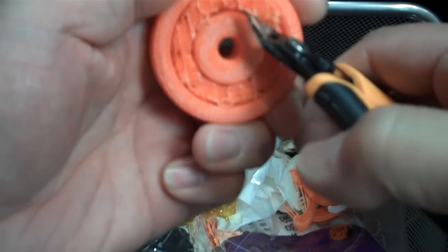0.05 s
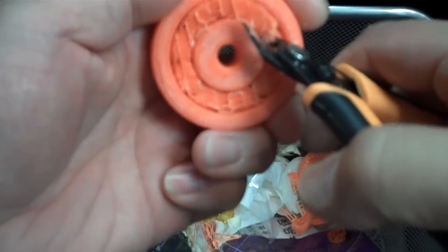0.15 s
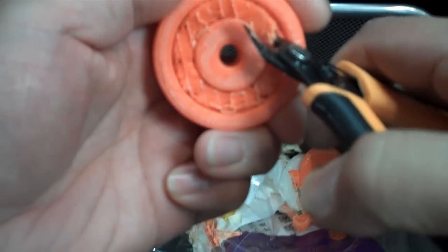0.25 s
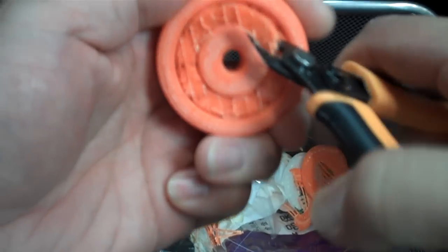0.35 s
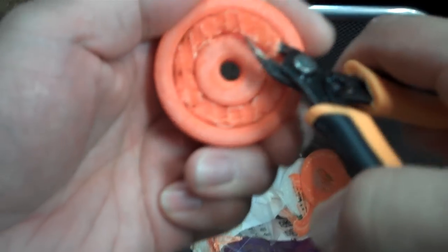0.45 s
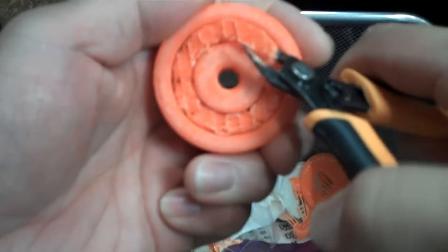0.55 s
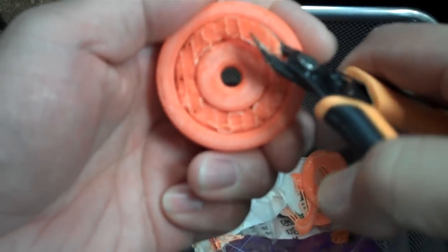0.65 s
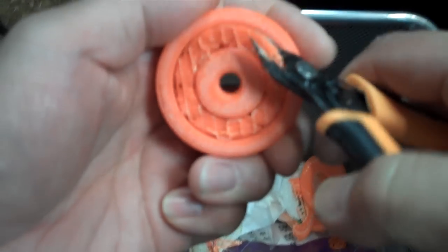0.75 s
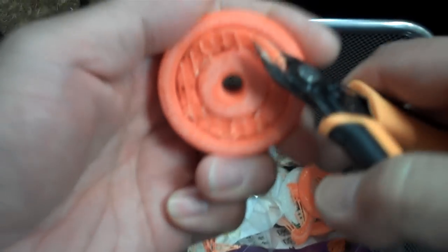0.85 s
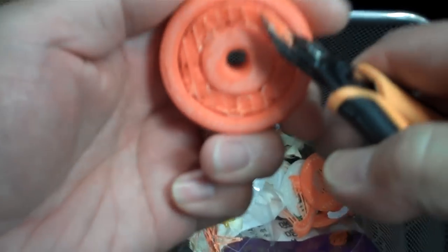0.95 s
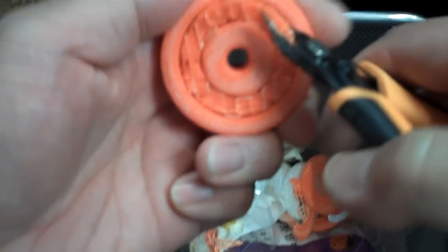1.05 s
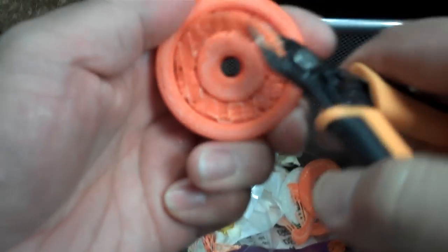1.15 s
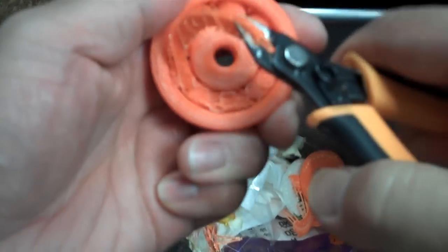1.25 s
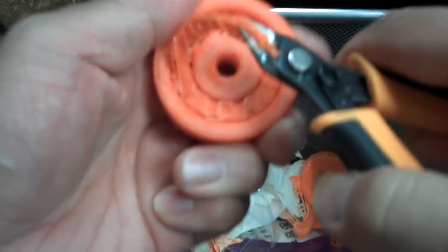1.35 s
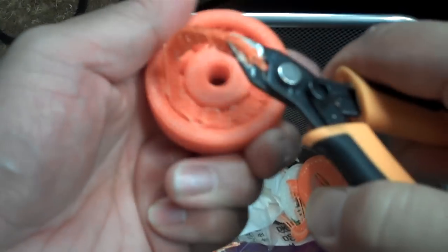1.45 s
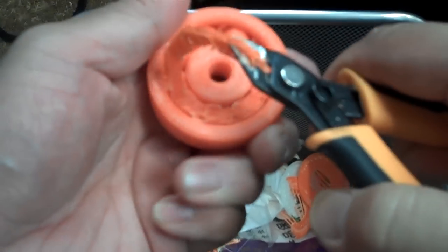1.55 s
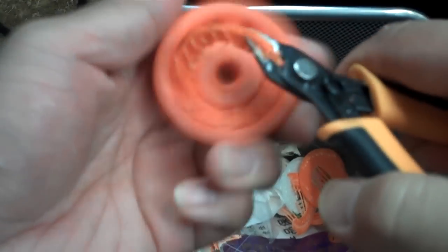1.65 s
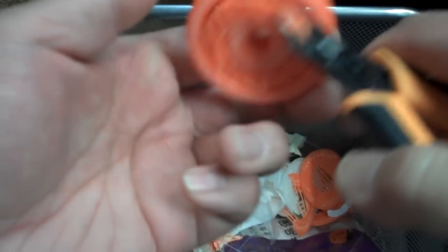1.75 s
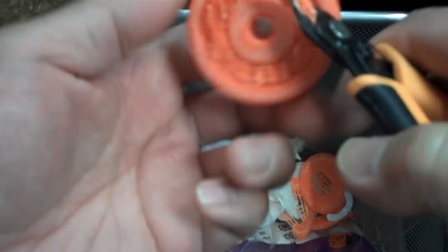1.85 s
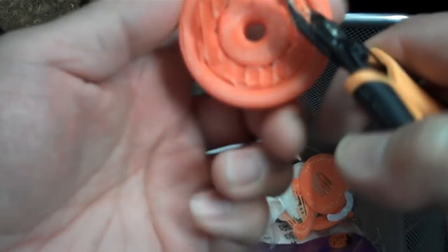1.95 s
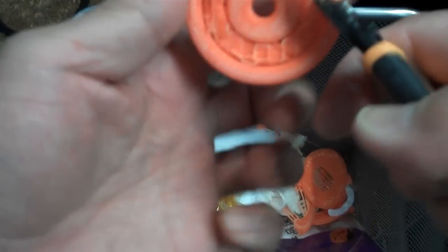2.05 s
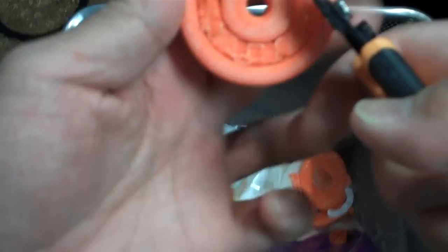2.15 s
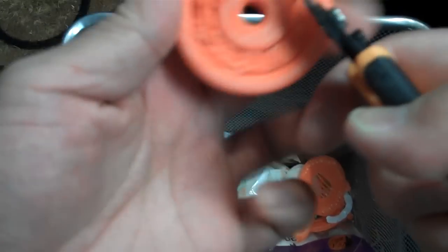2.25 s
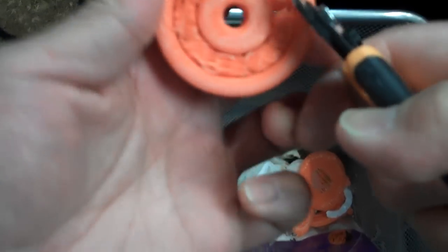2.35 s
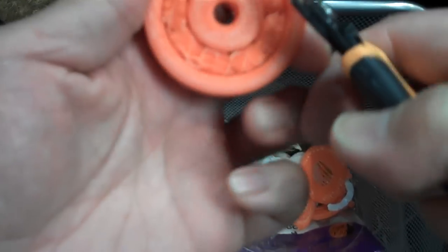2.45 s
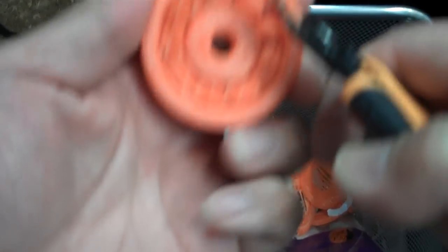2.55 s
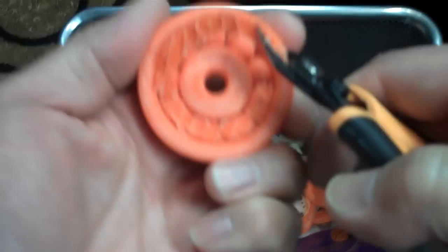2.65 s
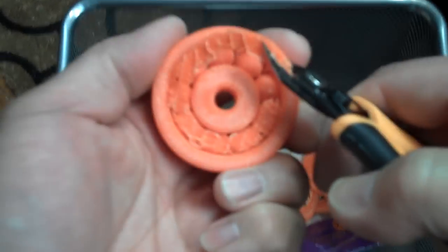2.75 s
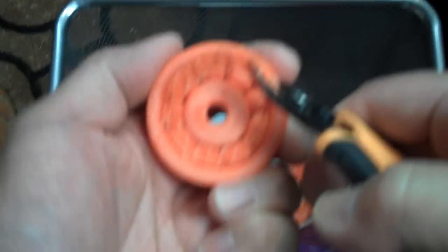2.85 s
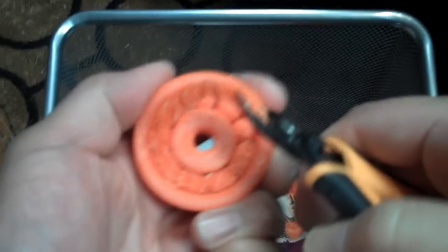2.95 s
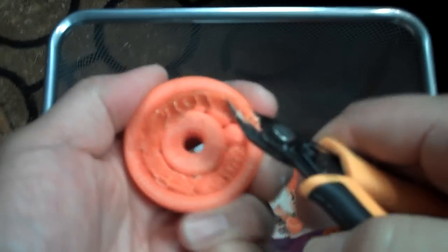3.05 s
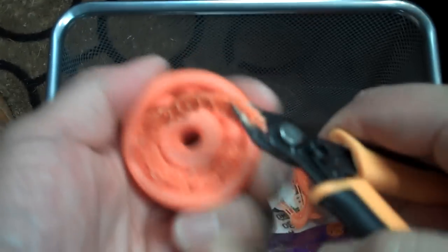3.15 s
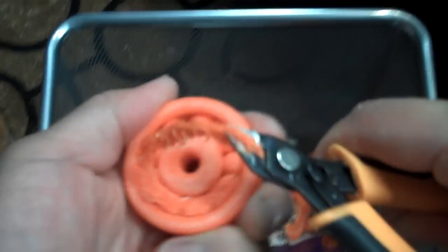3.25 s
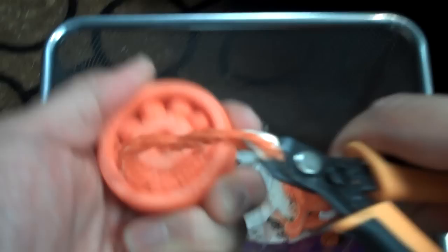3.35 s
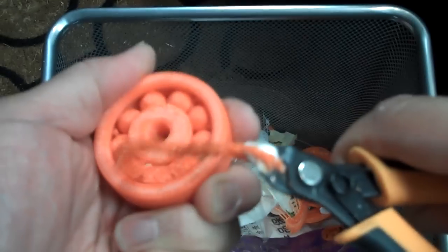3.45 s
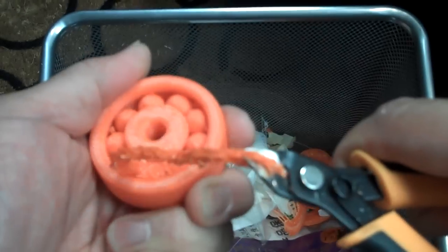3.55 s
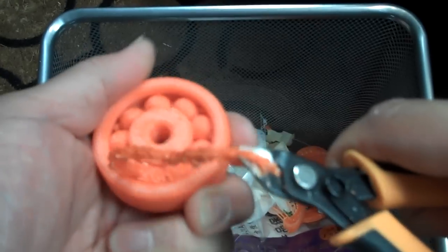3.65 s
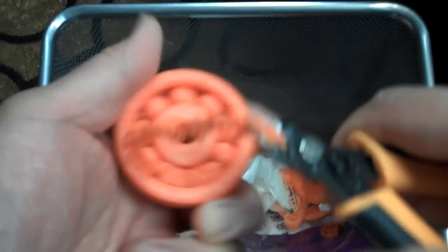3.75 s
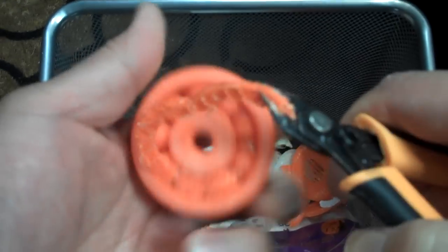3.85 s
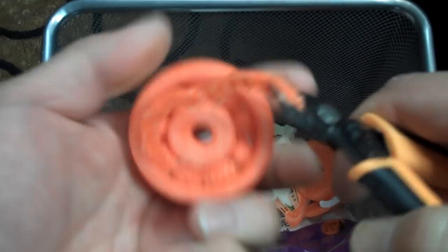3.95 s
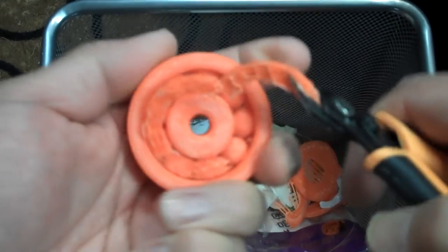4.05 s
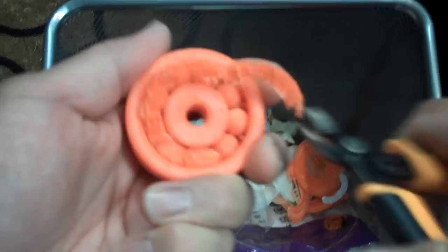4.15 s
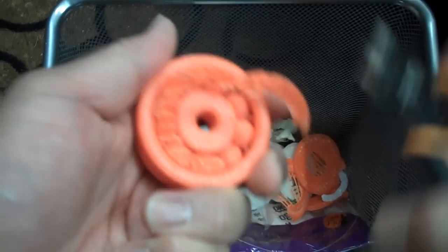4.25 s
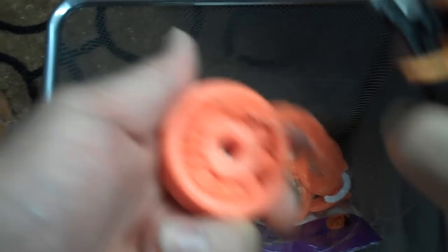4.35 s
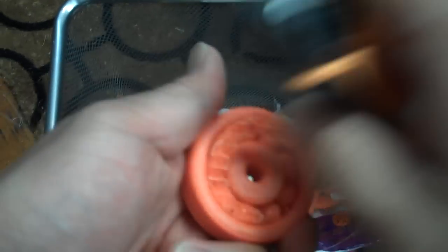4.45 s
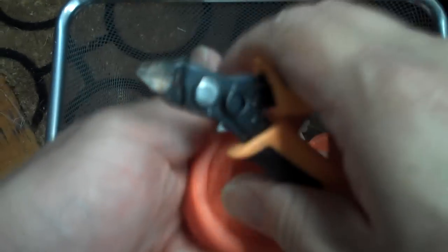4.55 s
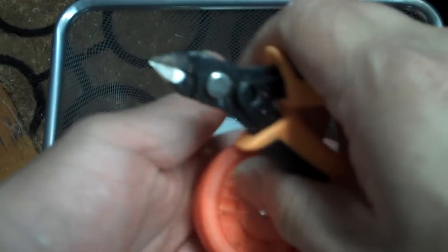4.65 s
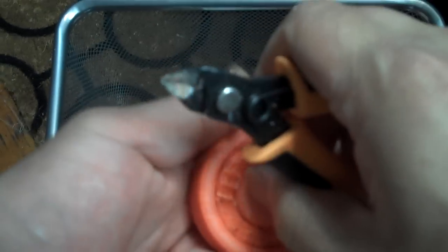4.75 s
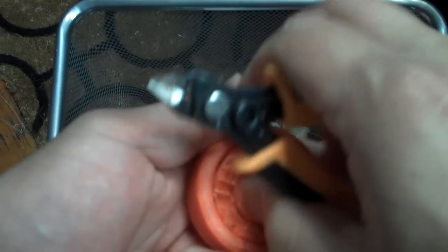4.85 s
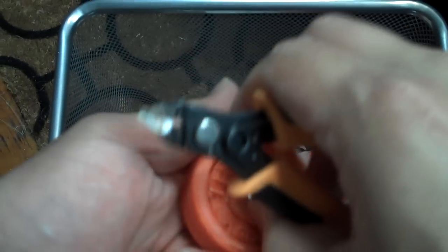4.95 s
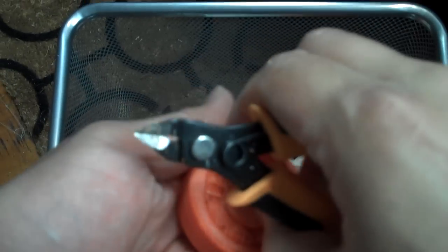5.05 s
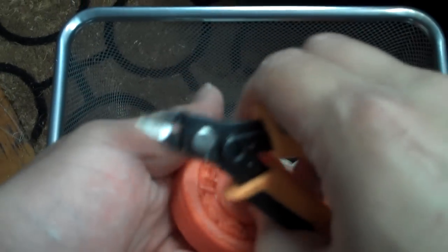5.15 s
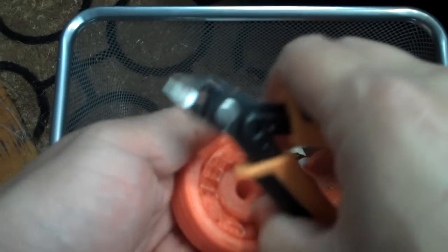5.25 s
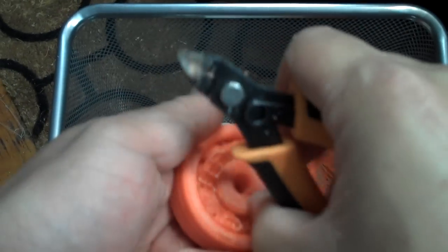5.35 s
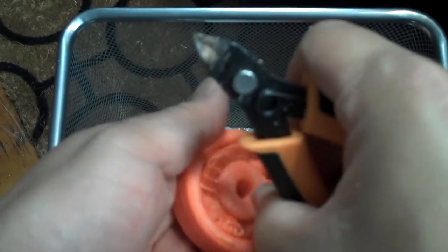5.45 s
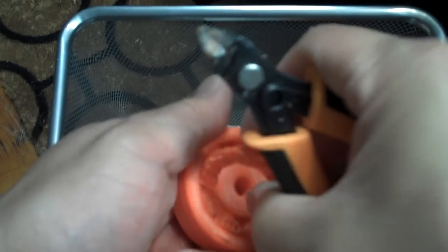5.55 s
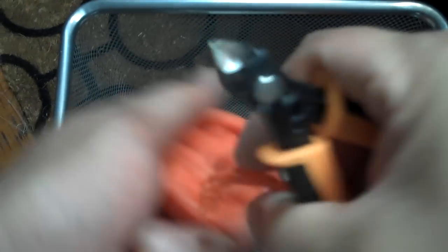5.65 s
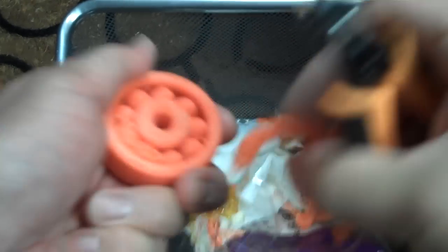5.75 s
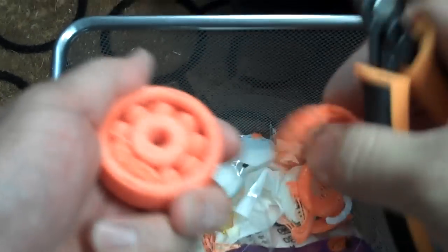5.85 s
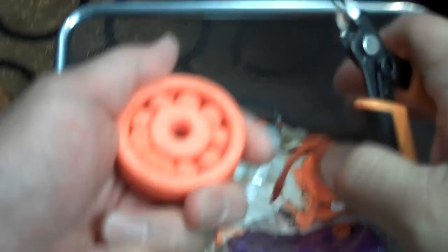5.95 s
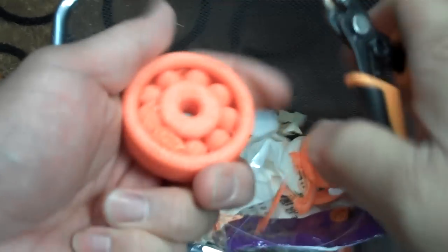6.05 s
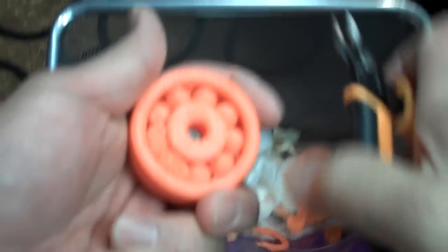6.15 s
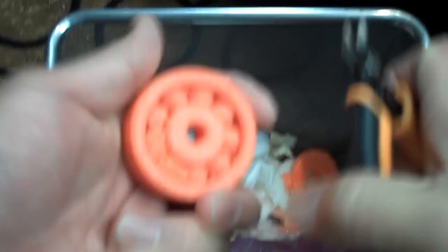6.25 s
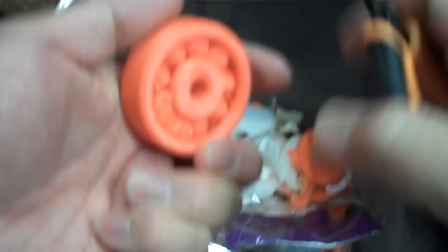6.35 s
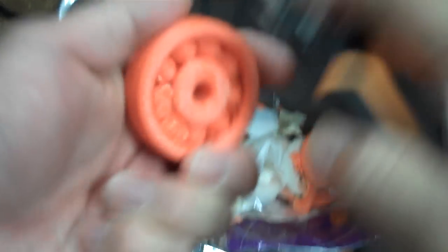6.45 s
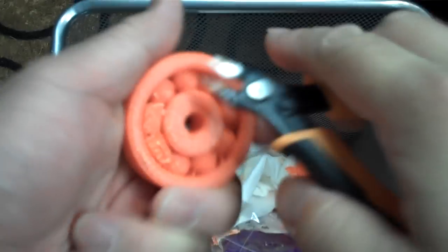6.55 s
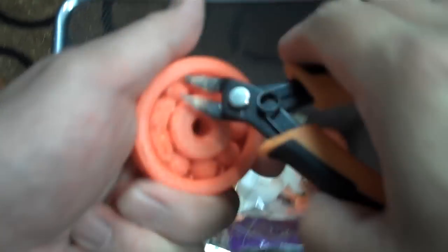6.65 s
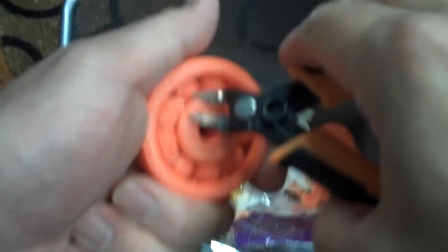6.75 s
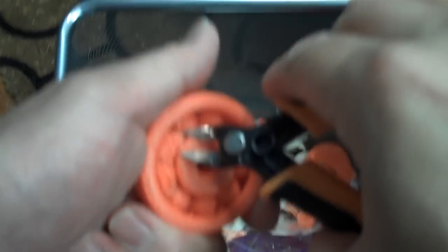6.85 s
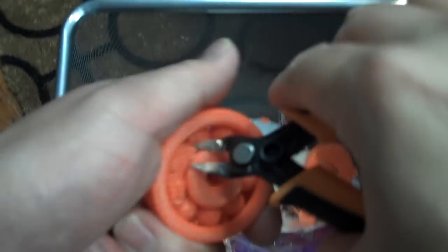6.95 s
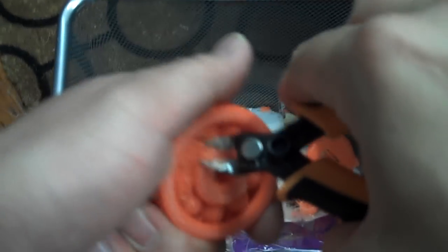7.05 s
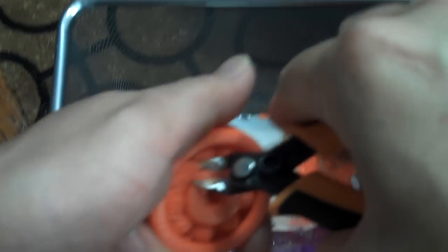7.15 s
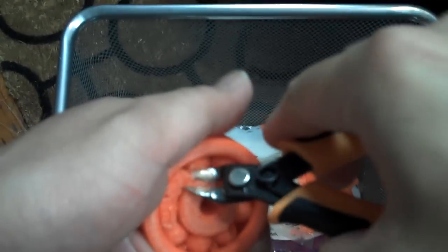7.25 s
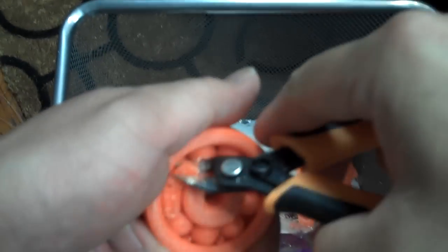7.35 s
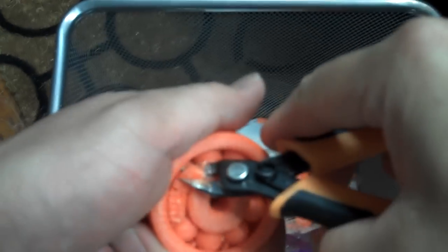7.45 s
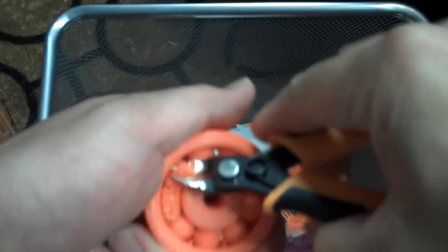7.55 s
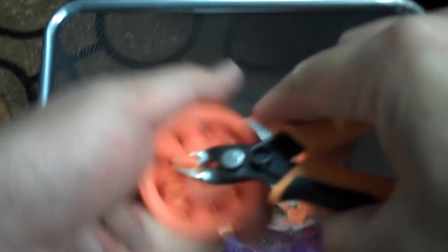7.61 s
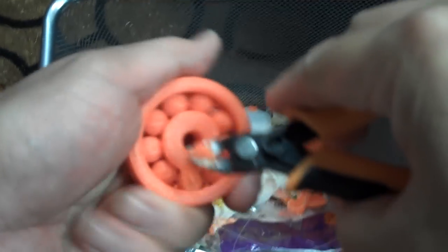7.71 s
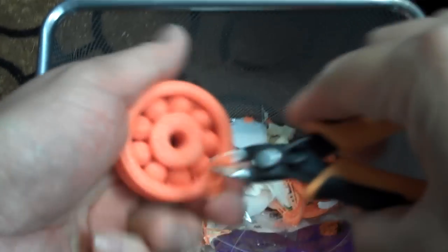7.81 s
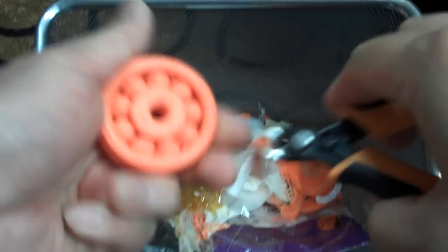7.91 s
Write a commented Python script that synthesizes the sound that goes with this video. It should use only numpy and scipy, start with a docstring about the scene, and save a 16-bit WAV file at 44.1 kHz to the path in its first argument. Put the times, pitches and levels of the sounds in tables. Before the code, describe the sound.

Very close to a small camera microphone in a quiet room, side cutters crack brittle plastic supports off a hollow printed part. Isolated hard snaps come first, then tight clusters, separated by dry ticks and pauses. Midway, lighter clicks and soft grainy rubbing follow as loose scrap is pulled away. A last rapid cluster of snaps ends it. Faint hiss and mains hum sit underneath, dipping after the loud cracks.

```python
"""A sharp plastic snap over faint air hiss and a 120 Hz mains hum, then more snaps, ticks and grainy rubbing:
side cutters snip, crack and scrape supports off a small printed part, close to a camera microphone.
Each snap is a flurry of random fractures ringing modes of the part and jolting the hand; ticks are lighter.
Rubbing is shaped noise; a short bright room tail answers snaps and ticks, and the gain control sinks after
loud snaps."""
import sys
import numpy as np
from scipy import signal
from scipy.fft import rfft, irfft
from scipy.io import wavfile
from scipy.ndimage import uniform_filter1d

SR = 44100
rng = np.random.default_rng(int(sys.argv[2]) if len(sys.argv) > 2 else 0)


def inscribe(sig):
    """Save sig as 16-bit PCM at rate SR to the path in sys.argv[1].

    A 1-D sig is mono; a 2-D sig holds one channel per row.
    Samples are clipped to [-1, 1] before scaling.
    """
    pcm = np.round(np.clip(np.atleast_2d(sig).T, -1, 1) * 32767)
    wavfile.write(sys.argv[1], SR, pcm.astype(np.int16))


N = 351918


def gain_of(db):
    """Decibels to amplitude."""
    return 10 ** (np.asarray(db) / 20)


def evened(x):
    """Scales to rms 1."""
    return x / np.sqrt(np.mean(abs(x) ** 2) + 1e-20)


def read(points, hz):
    """Interpolates a spectrum on a log-frequency axis."""
    point_hz, value = np.transpose(points)
    return np.interp(np.log(hz + 1), np.log(point_hz + 1), value)


def add(mix, start_s, sound):
    """Mixes a sound in at start_s."""
    part = mix[round(start_s * SR):][:len(sound)]
    part += sound[:len(part)]


def mode(hz, centre_hz, width_hz):
    """Complex response of a damped resonance, 1 at its peak."""
    damping = 1j * hz * width_hz
    return damping / (centre_hz ** 2 - hz ** 2 + damping)


def noise(colour, patchy_db):
    """Coloured noise of rms 1 from random short-time spectra with drifting patches."""
    real, imag, patches = rng.standard_normal((N // 256 + 5, 513, 3)).T
    patches = uniform_filter1d(patches, size=14, axis=0)
    patches = evened(uniform_filter1d(patches, size=12, axis=1))
    colour_db = read(colour, np.fft.rfftfreq(1024, 1 / SR))[:, None]
    spectra = (real + 1j * imag) * gain_of(colour_db + patchy_db * patches)
    return evened(signal.istft(spectra, nperseg=1024, noverlap=768)[1][:N])


# room air and microphone hiss spectrum: pitch_hz, relative density_db (per Hz)
AIR_COLOUR = [(12, -33.5), (20, 0), (30, -1.5), (60, -13.5), (119, -17.5), (140, -13), (165, -12),
              (365, -3.5), (508, -11), (725, -9.5), (1610, -13.5), (2490, -18), (10600, -28.5),
              (14000, -35.5)]
AIR_DB, HUM_DB, HUM_HZ, HUM_WAVER_DB = -65.5, -75, 120, 0.57  # rms levels


def background():
    """Steady coloured noise plus a mains sine whose level wavers slowly."""
    waver = evened(uniform_filter1d(rng.standard_normal(N), size=9000))
    hum_gain = np.sqrt(2) * gain_of(HUM_DB + HUM_WAVER_DB * waver)
    hum = hum_gain * np.sin(2 * np.pi * HUM_HZ * np.arange(N) / SR)
    return gain_of(AIR_DB) * noise(AIR_COLOUR, patchy_db=2.0) + hum


# time for the tail to fall 60 dB: pitch_hz, decay_s
ROOM_DECAY = [(300, .14), (1500, .21), (2800, 0.45), (6000, 0.56), (10000, 0.38), (14000, 0.12)]
# spectrum of the tail: pitch_hz, relative level_db
ROOM_TAIL_COLOUR = [(500, -28), (2300, 1), (2900, -5.5), (4500, -2.5), (6000, -4), (8500, -6), (11000, 2),
                    (14000, -6)]


def room(x):
    """Sparse taps of random sign, each band dying at its own speed; three tails crossfade in turn."""
    out = np.zeros(N)
    turn = np.arange(N) / SR * 1.7
    for k in range(3):
        taps = np.zeros(SR // 2)
        at = np.arange(300, len(taps) - 12, 12)
        taps[at + rng.integers(0, 12, len(at))] = rng.choice([-1., 1.], len(at))
        hz, t_s, spectra = signal.stft(taps, SR, nperseg=256)
        decay_db = 60 * t_s / read(ROOM_DECAY, hz)[:, None]
        spectra = spectra * gain_of(read(ROOM_TAIL_COLOUR, hz)[:, None] - decay_db)
        tail = signal.istft(spectra, SR, nperseg=256)[1]
        window = np.sqrt(2 / 3) * np.cos(np.pi * (turn + k / 3))  # the three powers sum to 1
        out += signal.oaconvolve(x * window, tail / np.linalg.norm(tail))[:N]
    return out


# strokes of fingers, jaws and loose scrap, each a list of breakpoints: time_s, level_db, treble_db
STROKES = [
    [(2.2, -82, -9), (2.356, -71, -3), (2.5, -97, -6)],
    [(4.2, -89, -3), (4.34, -63.5, -21), (4.5, -72, -3), (4.684, -82, -6), (4.828, -78, -3),
     (4.92, -67, -10), (5.04, -99, -9), (5.12, -63, 0), (5.2, -92, -3), (5.47, -69.5, 6)],
    [(6.05, -72, 5), (6.158, -78, -1), (6.172, -44, -9), (6.27, -58, -16), (6.335, -56.5, -20),
     (6.45, -65.5, -3), (6.592, -70.5, -12), (6.714, -65, -5), (6.864, -84, 0), (7.3, -86.5, 8.5)],
]
# spectrum of the rubbing hiss: pitch_hz, relative level_db
RUB_HISS_COLOUR = [(300, -3), (1000, -1.5), (3000, -4), (5000, 3.5), (8000, -4), (11000, 4), (14000, -4)]
RUB_SPLIT_HZ, GRAIN_DB = 7500, 3.3  # treble starts here; rms swing of the grain


def rubbing():
    """Grainy hiss of skin, steel and scrap sliding on ribbed plastic."""
    level, treble_db, t_s = np.zeros(N), np.zeros(N), np.arange(N) / SR
    for stroke in STROKES:
        time_s, level_db, top_db = np.transpose(stroke)
        level += gain_of(np.interp(t_s, time_s, level_db, -130, -130))
        treble_db += np.interp(t_s, time_s, top_db, 0, 0)
    grain_db = GRAIN_DB * evened(uniform_filter1d(rng.standard_normal(N), size=90))
    hiss = evened(gain_of(grain_db) * noise(RUB_HISS_COLOUR, patchy_db=.7))
    lowpass = signal.butter(2, RUB_SPLIT_HZ, fs=SR, output="sos")
    dull = signal.sosfiltfilt(lowpass, hiss)
    treble = gain_of(treble_db) * (hiss - dull)
    return uniform_filter1d(level, size=300) * (dull + treble)


FAINT_PER_S, FAINT_DB, FAINT_MS, FAINT_RING_HZ = 7, (-69, -62), (2.5, 9), (2300, 6500)  # ranges


def faint_ticks():
    """Stray ticks scattered evenly at random through each rubbing stroke."""
    rows = []
    for stroke in STROKES:
        span_s = (stroke[0][0], stroke[-1][0])
        low, high = np.transpose([span_s, FAINT_DB, FAINT_MS, FAINT_RING_HZ])
        count = int(FAINT_PER_S * (high[0] - low[0]) + .5)
        rows += list(low + (high - low) * rng.random((count, 4)))
    return rows


# jaw tips and fingers ticking over the ribs: start_s, level_db, length_ms, ring_hz
RIB_TICKS = [(0.3396, -57.5, 3, 10600), (0.4411, -63, 2.5, 10500), (0.4657, -48.5, 5.7, 6240),
             (0.4914, -60.5, 4.4, 6090), (0.7186, -43.5, 3, 6300), (0.7236, -59, 11, 6490),
             (0.788, -39, 1.34, 6140), (0.8122, -56, 3.4, 5370), (0.8256, -58, 2, 6400),
             (0.946, -59.5, 3.6, 5900), (0.9682, -55.5, 2.6, 2700), (1.497, -50, 1.3, 11320),
             (1.748, -54, 7.1, 3950), (2.0405, -59, 2.7, 2860), (2.0962, -60.5, 5.7, 1580),
             (2.215, -51.5, 2.4, 2440), (2.571, -55.5, 2.9, 11350), (3.0116, -53, 2.4, 10570),
             (3.0208, -54.5, 3.7, 8850), (3.3612, -41.5, 3.6, 10900), (3.6167, -42, 2.1, 3800),
             (3.846, -41, 2.8, 2210), (3.8664, -53, 2.7, 12500), (3.8828, -56, 5.2, 3450),
             (3.9344, -55, 3.6, 5840), (3.9652, -46.5, 3.9, 4500), (4.0011, -59, 2.2, 3800),
             (4.1642, -48, 4.5, 10600), (4.1795, -50, 3.8, 3150), (4.2006, -56, 5.6, 10700),
             (4.2776, -61.5, 6, 3500), (4.3442, -63, 19, 4400), (4.5947, -51.5, 1.4, 4190),
             (4.6741, -55.5, 23, 3100), (4.7, -46, 5.1, 4570), (4.717, -43, 9.5, 6700),
             (4.8388, -43, 5.2, 3960), (4.8441, -36, 3.3, 7400), (4.8908, -48, 14, 7500),
             (4.9033, -48, 9, 3000), (4.9163, -45, 6.7, 7600), (4.9266, -53.5, 5.5, 7500),
             (4.9416, -62, 8.4, 2850), (4.9841, -52.5, 2.7, 13300), (4.989, -56.5, 3.3, 4100),
             (5.0975, -57, 6.8, 8000), (5.1147, -60, 13, 11500), (5.1296, -56.5, 8.4, 7850),
             (5.2231, -46.5, 4.6, 7000), (5.2565, -53.5, 9, 7160), (5.363, -60.5, 4.7, 7000),
             (5.468, -58, 13, 10790), (5.4776, -36.5, 2.9, 4200), (5.7172, -33, 3.1, 3200),
             (5.8, -39.5, 2.05, 3430), (5.9358, -47, 0.73, 4750), (5.974, -53.5, 1.8, 3760),
             (6.1323, -54, 1.4, 4470), (6.1643, -43, 3, 4270), (6.2138, -57, 11, 5300),
             (6.311, -58, 9.8, 2380), (6.3313, -60, 18, 2920), (6.621, -61, 11, 2540),
             (7.5592, -51.5, 1.8, 4220), (7.619, -63, 3, 2480), (7.855, -55.5, 16.5, 4130),
             (7.9615, -59.5, 10.5, 2980)]
TICK_RING_DB, TICK_JOLT_DB, TICK_BODY_DB, TICK_ROOM_DB = -5, -34, -15.5, -25.5
DULL_DB, BRIGHT_DB = -5.5, -2.5  # top modes of ticks ringing below or above TOP_HZ
TICK_KNOCK_HZ = (587, 2020)


def ticks():
    """Ticks are snaps with a very weak jolt; the knock pitch falls anywhere on the wall."""
    rows = []
    low_hz, high_hz = TICK_KNOCK_HZ
    for start_s, level_db, length_ms, ring_hz in RIB_TICKS + faint_ticks():
        top_db = BRIGHT_DB if ring_hz > TOP_HZ else DULL_DB
        knock_hz = low_hz * (high_hz / low_hz) ** rng.random()
        rows.append((start_s, level_db, length_ms, ring_hz, TICK_RING_DB, top_db, TICK_JOLT_DB,
                     TICK_BODY_DB, knock_hz, TICK_ROOM_DB))
    return rows


# modes of the part's shell: pitch_hz, width_hz, level_db
SHELL_MODES = [(2500, 700, -9), (3170, 550, -2), (4050, 700, -3), (4930, 700, -5), (6120, 600, -2),
               (7330, 700, -3), (8250, 900, -4), (9300, 1000, -1), (10500, 1000, 0), (11500, 1000, -1),
               (12800, 1300, -5)]
TOP_HZ, SPREAD_DB, CRACK_DB = 8600, 3, 3  # top modes start; random spread of modes and of crack sizes
RISE, FALL, FALL_BEND = .17, 0.55, 1.3  # flurry rise and fall per length; abruptness of the end
SHARDS, SHARDS_FALL = .25, 1.2  # share of loose shards; their fall per length
RING_DAMPING, FAR_STRUT_DB = .085, -6  # ring width per pitch; strut level as the room hears it
BODY_HZ, KNOCK_WIDTH_HZ, KNOCK_DB = (660, 2390), 400, -1
GRIP_HZ, GRIP_WIDTH_HZ, JOLT_MS = 413.7, 826, 0.81
THUD_OVER_JOLT_DB, PUSH_OVER_JOLT_DB = 5.0, -1.0
SNAP_LEN = 4096  # samples


def snap(row):
    """Fractures crowd into a few ms, then die; they ring the modes and the body and push the hand."""
    start_s, level_db, length_ms, ring_hz, ring_db, top_db, jolt_db, body_db, knock_hz, room_db = row
    blows, size_chance, mode_chance = rng.standard_normal((3, SNAP_LEN))
    t_ms, hz = np.arange(SNAP_LEN) * 1000 / SR, np.fft.rfftfreq(SNAP_LEN, 1 / SR)

    rise = 1 - np.exp(-t_ms / (RISE * length_ms))
    run = rise * np.exp(-(t_ms / (FALL * length_ms)) ** FALL_BEND)
    shards = SHARDS * np.exp(-t_ms / (SHARDS_FALL * length_ms)) * (1 - np.exp(-t_ms / length_ms))
    sizes = blows * gain_of(CRACK_DB * size_chance)
    cracks = rfft((run + shards) * sizes)
    heavy = rfft(run ** 2 * sizes)  # shorter; shards are too light to move the body

    modes = []
    for k, (mode_hz, width_hz, mode_db) in enumerate(SHELL_MODES):
        mode_gain = gain_of(mode_db + top_db * (mode_hz > TOP_HZ))
        modes.append((-1) ** k * mode_gain * mode(hz, mode_hz, width_hz))
    modes = np.array(modes)
    shell = evened(gain_of(SPREAD_DB * mode_chance[:len(modes)]) @ modes)
    strut = evened(mode(hz, ring_hz, RING_DAMPING * ring_hz))
    bandpass = signal.butter(2, BODY_HZ, "bandpass", fs=SR)
    body = evened(signal.freqz(*bandpass, hz, fs=SR)[1])
    body = body + gain_of(KNOCK_DB) * evened(mode(hz, knock_hz, KNOCK_WIDTH_HZ))  # wall near the jaws
    grip = mode(hz, GRIP_HZ, GRIP_WIDTH_HZ) ** 2  # the part thuds in the fingers

    ringing = evened(irfft(cracks * (shell + gain_of(ring_db) * strut)))
    knocking = gain_of(body_db) * evened(irfft(heavy * body))
    thud = gain_of(jolt_db + THUD_OVER_JOLT_DB) * evened(irfft(heavy * grip))
    u = t_ms / JOLT_MS
    push = gain_of(jolt_db + PUSH_OVER_JOLT_DB) * np.sign(mode_chance[-1]) * evened(u * np.exp(-u))
    direct = ringing + knocking + thud + push

    far_strut = gain_of(FAR_STRUT_DB + ring_db) * strut
    far = evened(irfft(evened(modes.sum(0)) + far_strut))  # all directions blended
    scale = gain_of(level_db) * np.sqrt(length_ms * SR / 1000 / SNAP_LEN)  # energy grows with length
    return start_s, scale * direct, scale * gain_of(room_db) * far


# struts breaking and jaws knocking the wall; levels after level_db are relative: start_s, level_db,
# length_ms, ring_hz (strut), ring_db, top_db (top modes), jolt_db, body_db, knock_hz,
# room_db (past the hands into the room)
SNAP_ROWS = [(0.1961, -17, 3.18, 6070, -2.5, -6, -16.5, -8.5, 555, -27.5),
             (0.516, -17, 9.2, 6200, -10, -3, -8.5, -7.5, 1350, -19.5),
             (0.5331, -34, 4.7, 6060, -4.5, -7.5, -30.5, -18, 1280, -28),
             (0.7403, -33, 1.9, 6400, -2, -1, -30, -20.5, 1060, -26),
             (1.2317, -19, 3.86, 4010, 0, -16.5, -14.5, -7, 850, -15.5),
             (1.2405, -26, 2.0, 11260, -3, 0, -14, -10, 870, -30),
             (1.2587, -28, 2.4, 10590, -3, 4, -9, -9, 550, -30),
             (1.2679, -19.5, 3.4, 3060, 3, -5, -16, -9, 1070, -18.5),
             (1.29, -22.5, 2.75, 3070, -4.5, -6.5, -26, -7, 1320, -31),
             (1.5099, -19.5, 3.7, 10950, 13, -21, -22, -6.5, 1030, -23),
             (1.5373, -14, 2.9, 12230, -3.5, 4, -28.5, -10.5, 1620, -26),
             (1.7842, -32, 5.4, 3730, -1.5, -3.5, -38, 3.5, 1250, -22.5),
             (1.9021, -64, 4.3, 4000, 8, -6, -33, 13, 995, -17),
             (2.356, -69.5, 3.5, 6470, -3, -10, -30, 15, 1030, -18),
             (3.0356, -29.5, 2.96, 11160, -1, 2.5, -12.5, -9, 640, -30),
             (3.118, -33, 2, 10010, -2, 5.5, -37, -36.5, 850, -19.5),
             (3.1368, -22, 4.5, 4480, -6.5, -1.5, -15, -3, 648, -17.5),
             (3.3694, -21, 3.3, 7230, 0, -1, -7.5, -6, 933, -18.5),
             (3.4, -26.5, 3.6, 6140, -15, -2.5, -10, -10.5, 550, -31),
             (3.4213, -21.5, 4, 12740, -1, -1.5, -15, -10, 1060, -22.5),
             (3.5304, -24.5, 1.9, 11000, 4, -7, -2, -17, 550, -26),
             (3.5459, -19.5, 2.95, 2395, -3.5, 9, -19, -8, 570, -25.5),
             (4.1496, -31, 3.6, 3840, -11.5, -3.5, -28, -19.5, 2000, -22),
             (4.7491, -40, 4.4, 11030, -3, -6, -26, -16, 2010, -10.5),
             (4.774, -28, 1.2, 6600, -19, -3, -30, -11, 2070, -36),
             (4.7925, -26.5, 2.24, 11240, -0.5, 1, -10, -17, 543, -28),
             (4.8489, -38, 6.1, 7220, -1, -1, -39, -18, 1150, -27),
             (5.2459, -31.5, 1.7, 7200, 27, 6, -35, -19, 1460, -35),
             (5.4951, -24, 2.93, 9770, 5, -2, -11.5, -12, 626, -20),
             (5.6985, -25, 2.2, 7180, 17.5, -17.5, -21, -4, 600, -39),
             (5.7051, -20.5, 5.04, 6200, -21.5, 2.5, -11.5, -10, 1050, -23),
             (5.7201, -28.5, 2.4, 3180, 2, -14, -30, -17, 826, -25),
             (6.1679, -37, 2.7, 4400, -3, -16, -17.5, -17, 1240, -24),
             (6.1871, -40, 6.6, 6840, 1, -12, -19, -6, 546, -21),
             (6.7579, -55, 4.4, 3120, 2.5, -6, -30, 4.5, 774, -10),
             (7.3465, -24, 4.25, 7380, 5.5, -0.5, -13.5, -8, 705, -33),
             (7.355, -23, 5.7, 6660, 0.5, -2.5, -17.5, -4, 1210, -18),
             (7.3841, -23.5, 2.55, 6800, -3, -5, -11.5, -36, 720, -29.5),
             (7.65, -32, 3.4, 11970, -1, -6, -19.5, -26, 796, -34.5),
             (7.6657, -18, 2.52, 3210, 8.5, -3.5, -12, -10, 920, -22),
             (7.6784, -32, 3.4, 5670, 5, -17, -25, -27, 1940, -30),
             (7.6892, -32, 3.7, 4600, 8, -15, -21, -25, 2000, -30),
             (7.6934, -26.5, 5.7, 5050, -1.5, -6, -31, -22.5, 2100, -23)]
WALLS_DB = -0.5  # how much the walls return


def scene():
    """Snaps, ticks and rubbing close by, snaps and ticks also in the room, over the background."""
    air = background()
    near, escaped = rubbing(), np.zeros(N)
    for row in SNAP_ROWS + ticks():
        start_s, direct, far = snap(row)
        add(near, start_s, direct)
        add(escaped, start_s, far)
    return (near + gain_of(WALLS_DB) * room(escaped) + air)[None]


THRESHOLD_DB, MAX_DUCK_DB, LAG_S = -35.5, 9.4, .138
OFFSET, CEILING, EDGE_HZ = -.00055, .6, 14000  # input's resting offset before ducking; saturation; band limit


def record(dry):
    """A sluggish gain control sinks after loud snaps and creeps back; peaks saturate; then the band limit."""
    hop = SR // 100
    power_db = 10 * np.log10(uniform_filter1d(dry[0] ** 2, size=hop)[::hop] + 1e-12)
    excess_db = np.clip(power_db - THRESHOLD_DB, 0, None)
    excess_db[0] += 6  # an extra dip near the start
    lag = np.exp(-.01 / LAG_S)
    for _ in range(3):  # three lags in a row: the dip is deepest about a quarter second late
        excess_db = signal.lfilter([1 - lag], [1, -lag], excess_db)
    duck_db = MAX_DUCK_DB * np.tanh(excess_db)
    duck_db = np.interp(np.arange(N) / hop, np.arange(len(duck_db)), duck_db)
    ducked = (dry + OFFSET) / gain_of(duck_db)
    saturated = CEILING * np.tanh(ducked / CEILING)
    lowpass = signal.firwin(101, EDGE_HZ, window=("kaiser", 9), fs=SR)
    return signal.oaconvolve(saturated, lowpass[None], "same")


dry = scene()
out = record(dry)
inscribe(out)
```